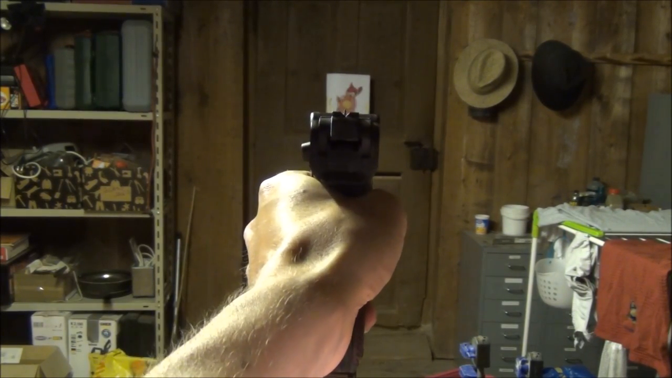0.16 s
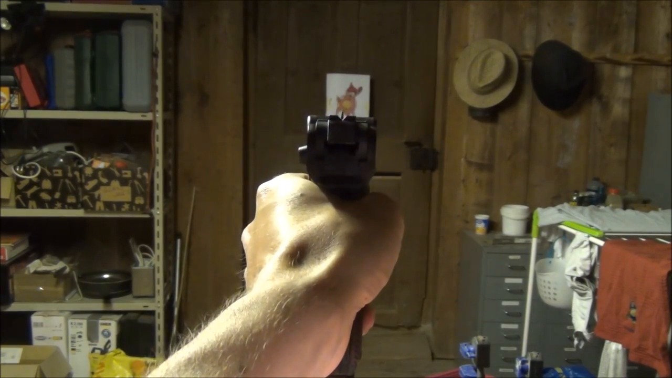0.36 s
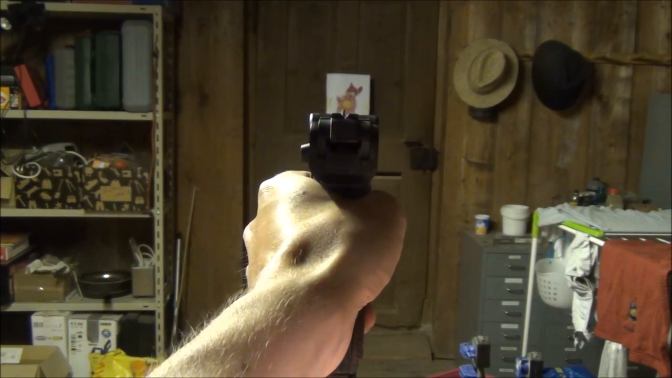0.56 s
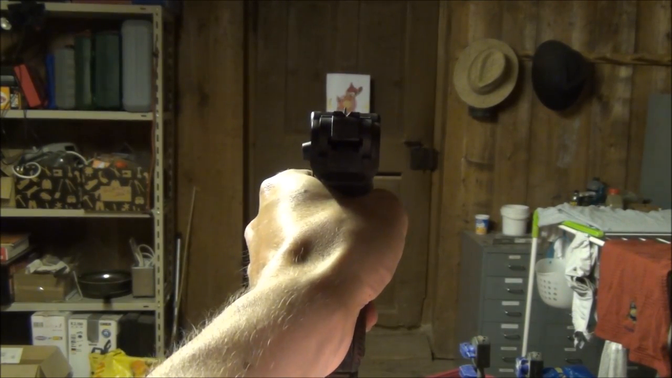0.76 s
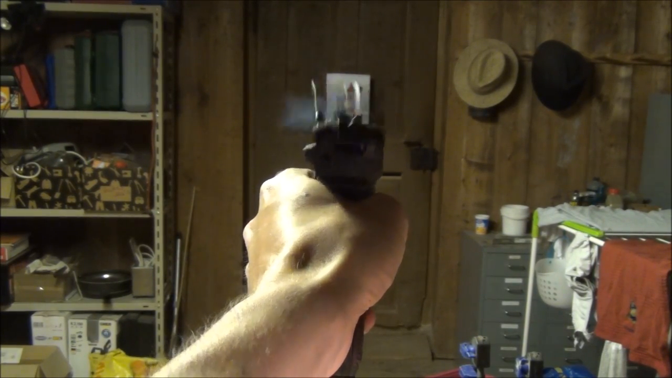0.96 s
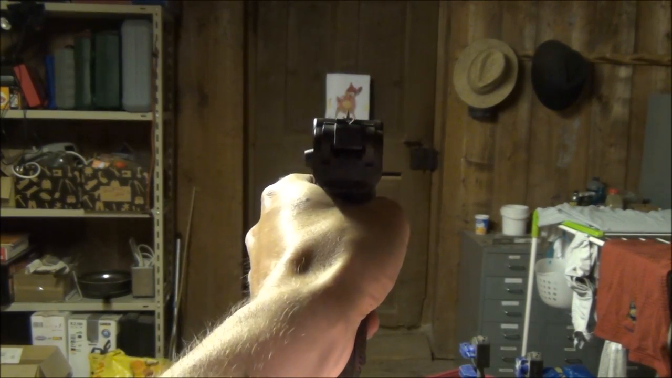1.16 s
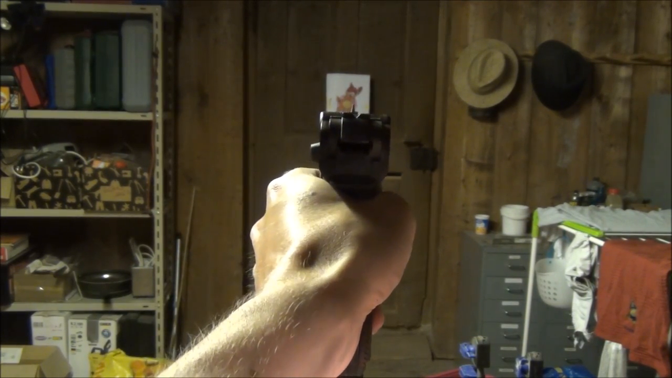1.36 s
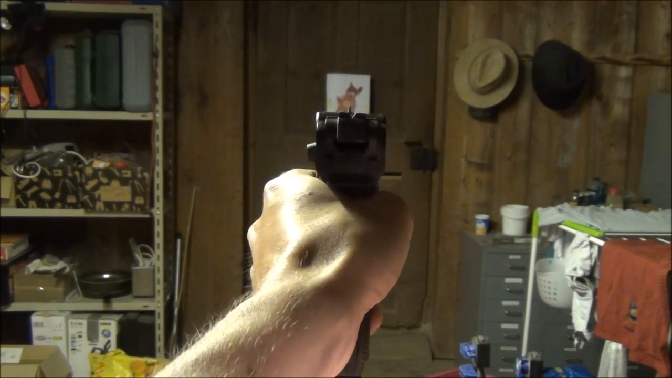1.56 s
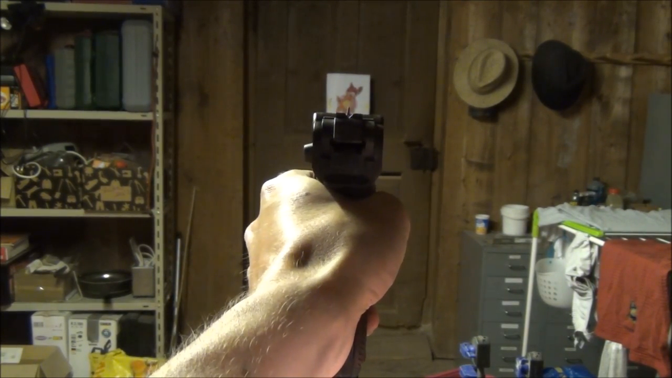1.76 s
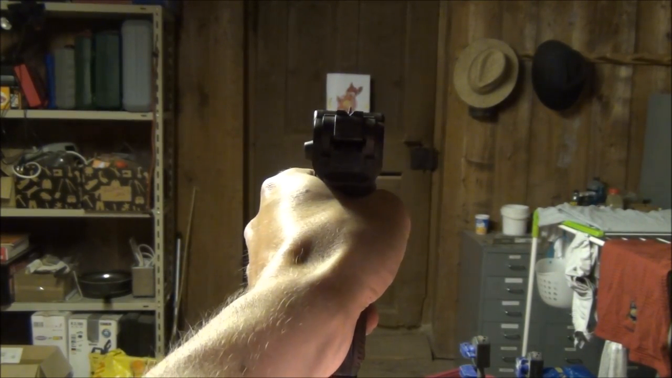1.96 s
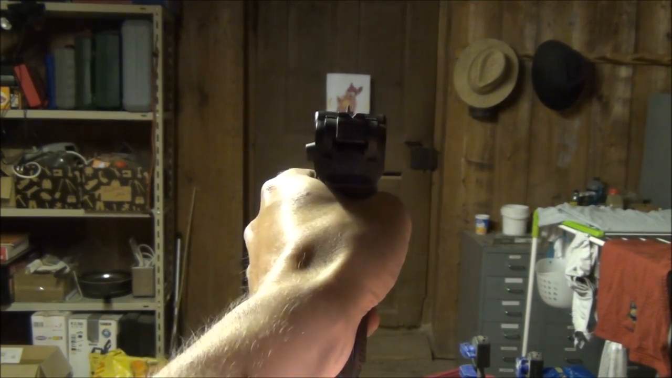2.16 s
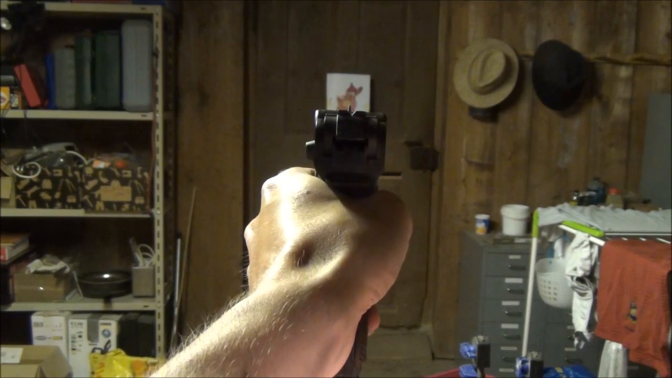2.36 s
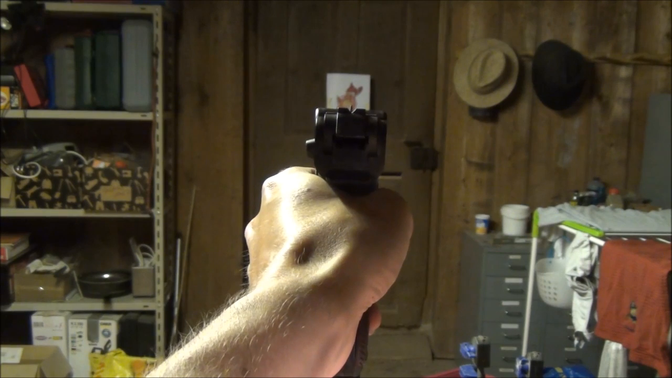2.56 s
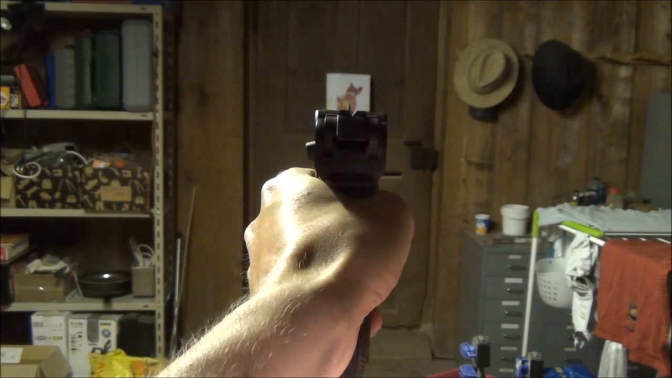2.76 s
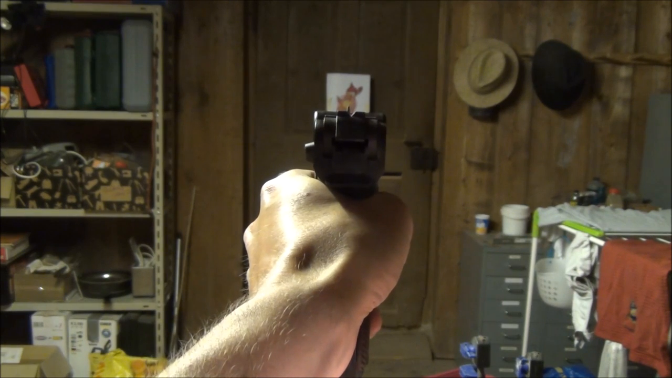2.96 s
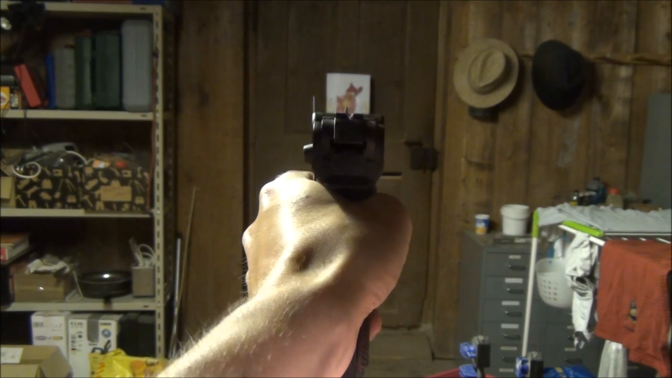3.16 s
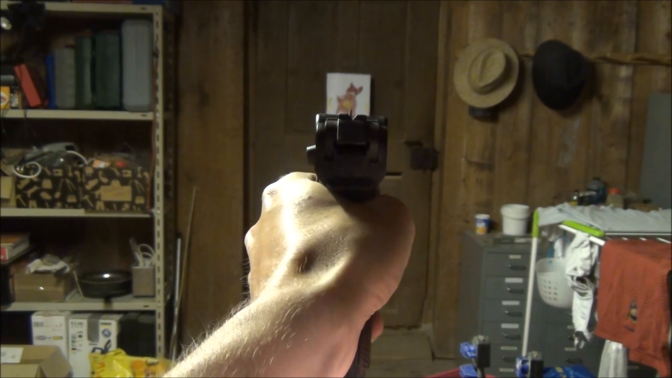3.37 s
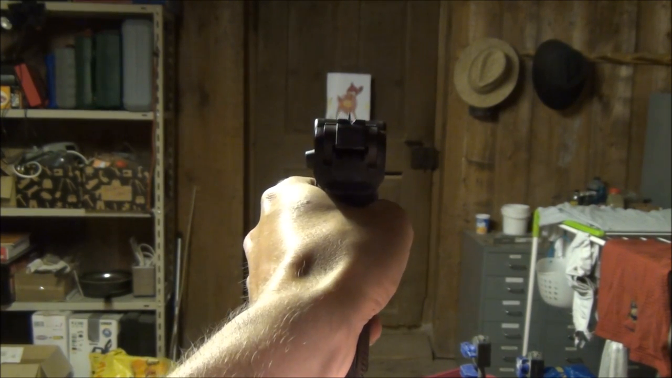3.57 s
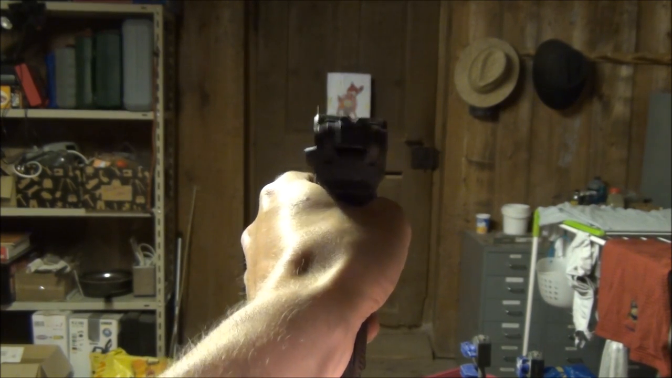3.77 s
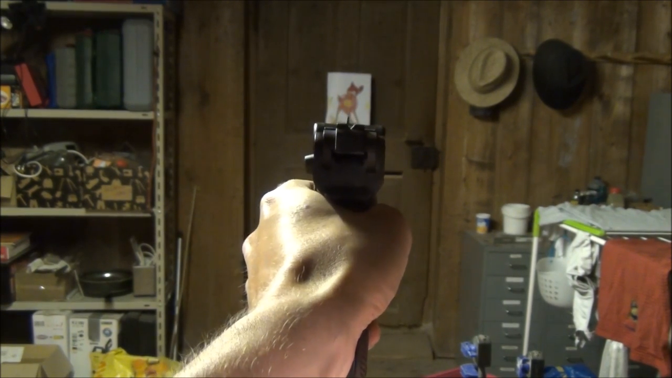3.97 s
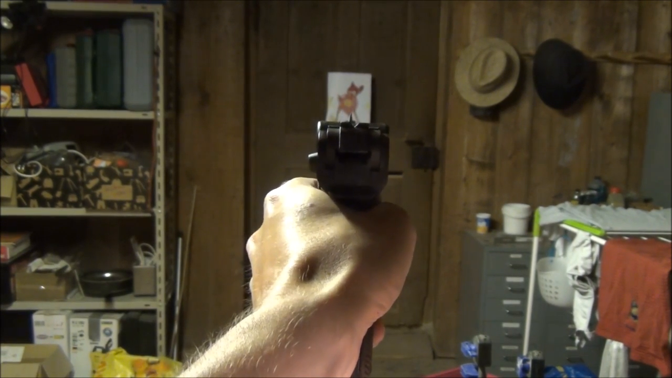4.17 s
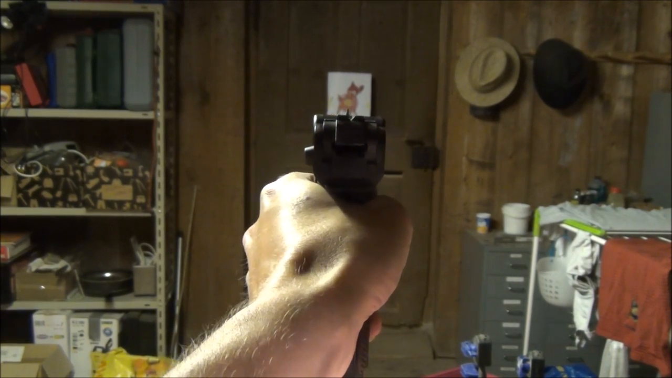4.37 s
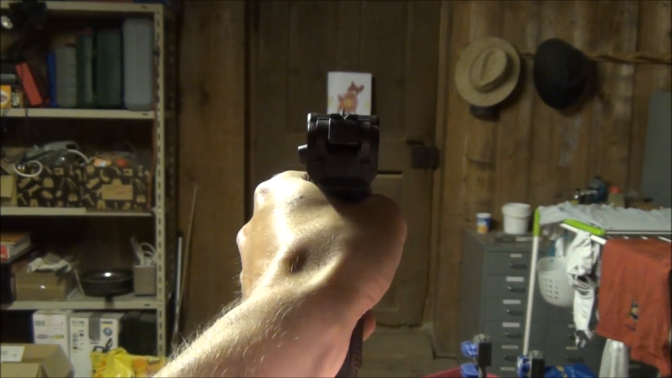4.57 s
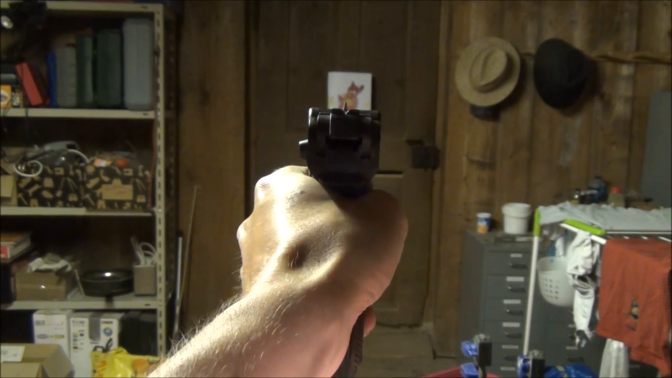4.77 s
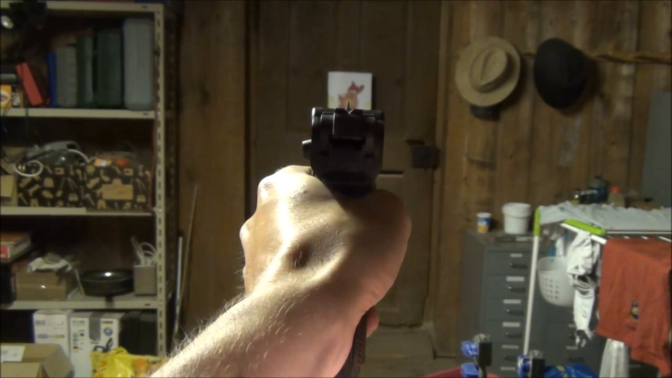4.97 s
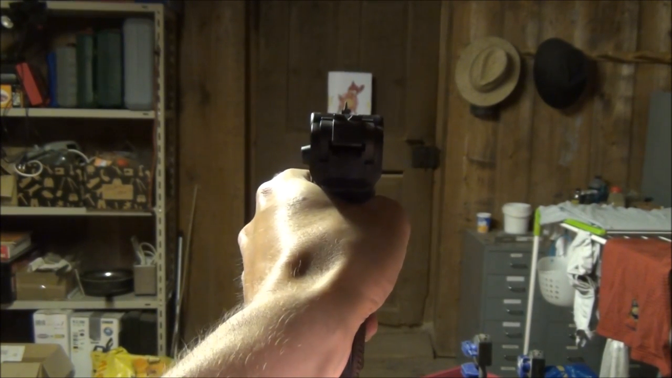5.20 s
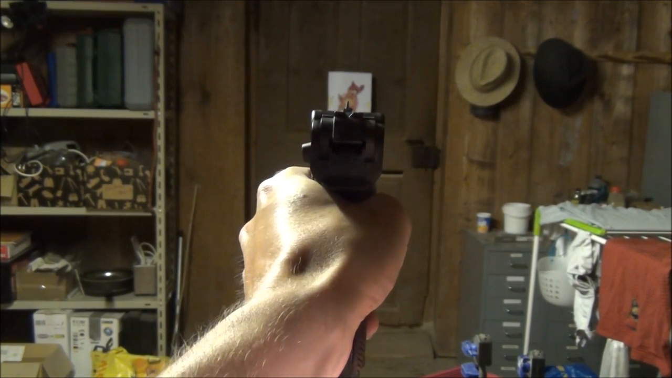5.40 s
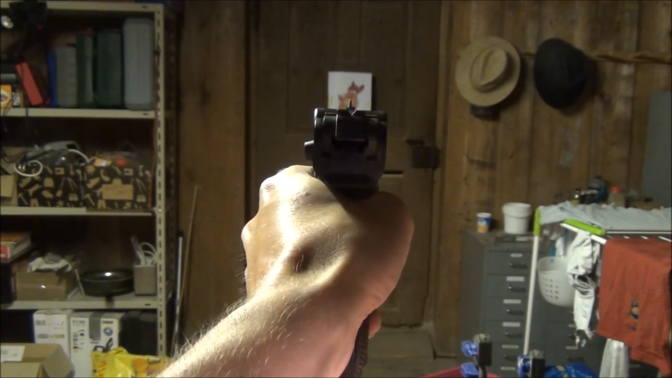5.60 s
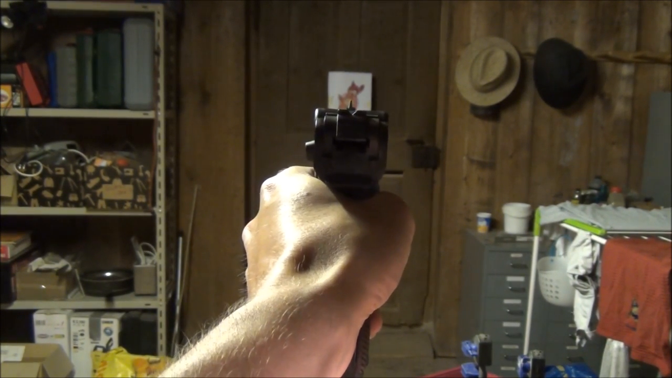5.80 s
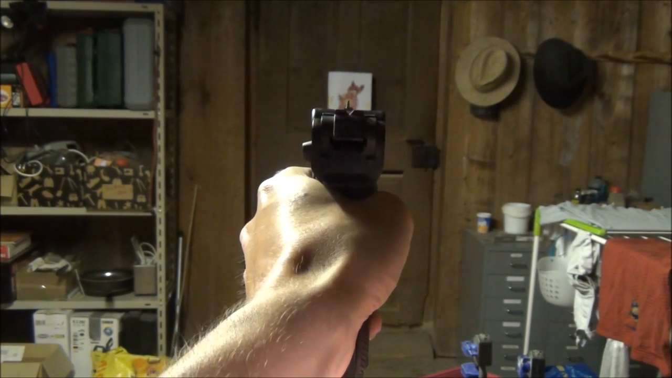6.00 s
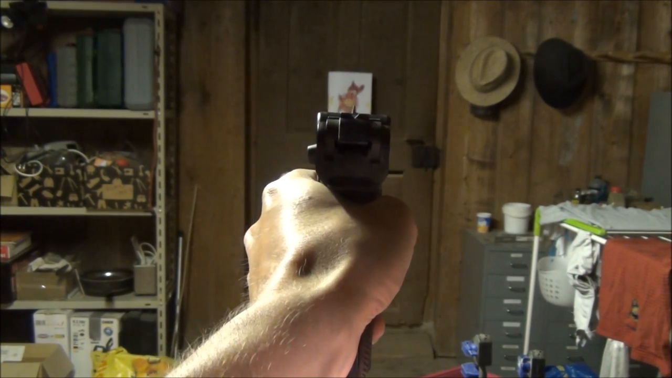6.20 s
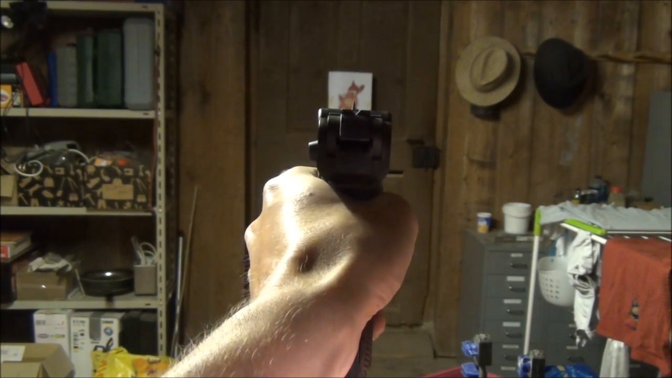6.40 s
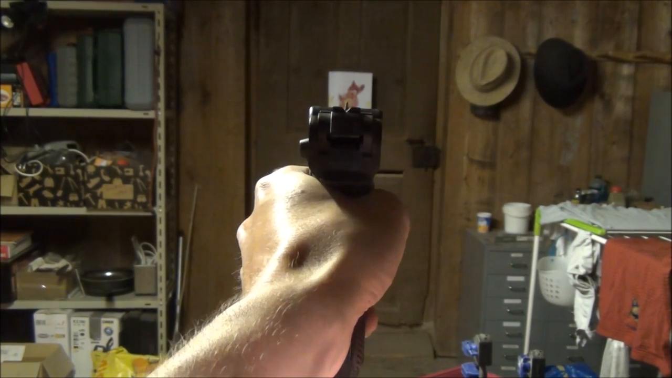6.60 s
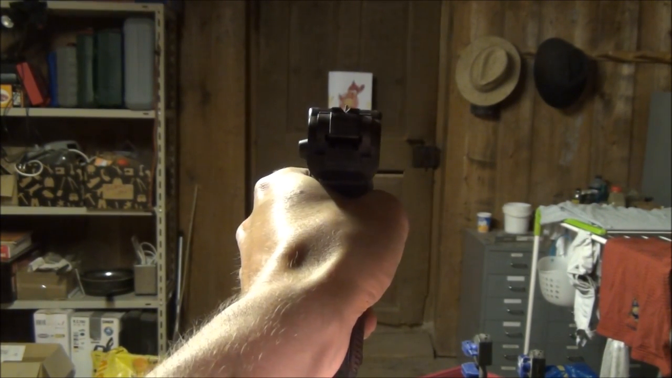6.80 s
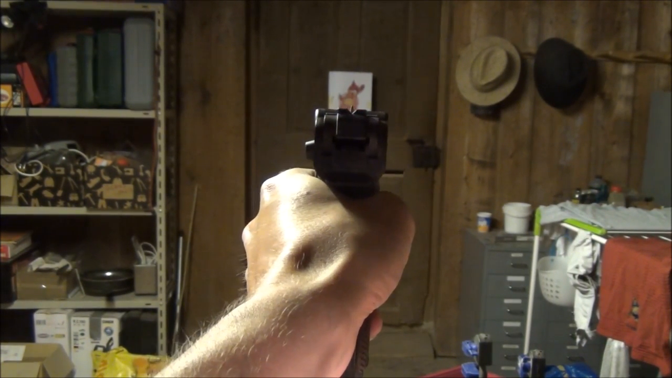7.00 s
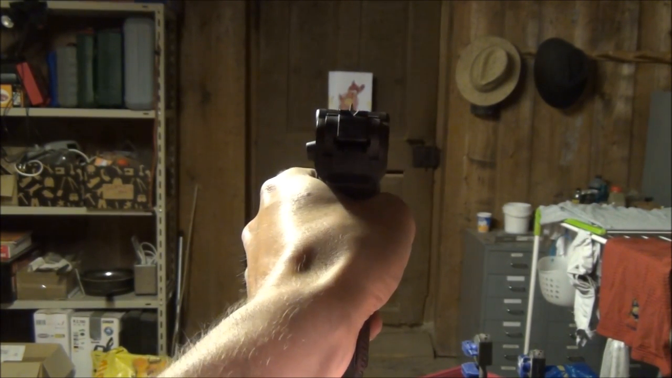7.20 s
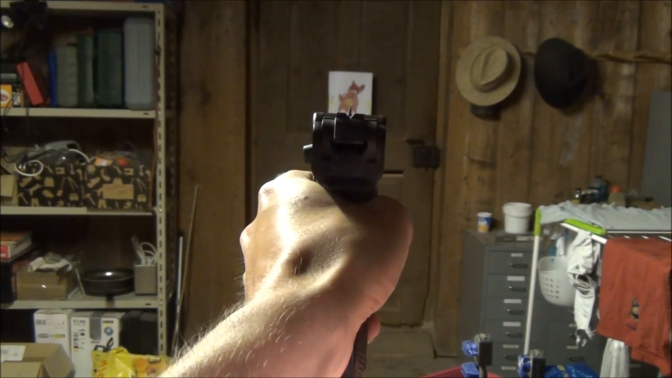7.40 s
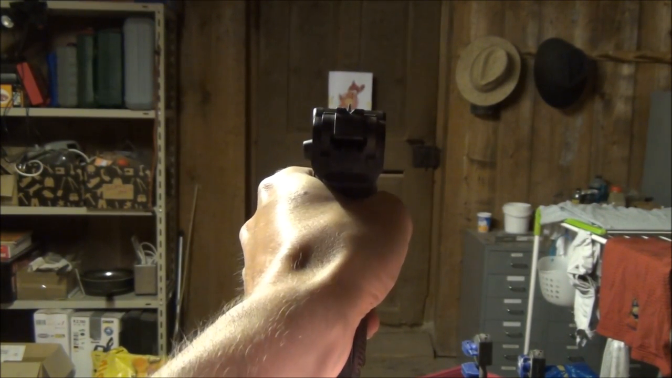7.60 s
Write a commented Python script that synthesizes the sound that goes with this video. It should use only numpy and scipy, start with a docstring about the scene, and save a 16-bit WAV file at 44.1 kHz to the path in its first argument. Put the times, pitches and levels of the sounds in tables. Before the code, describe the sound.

A gas pistol with a moving slide fires eight times indoors, very close to the microphones. The first shot stands alone, four follow about half a second apart, then three come slower. Each is a bright crack and gas burst with metallic slide clatter and a pellet smack on wood, followed by a short room echo. Small ticks and faint hum fill the gaps.

```python
"""Gas pistol in a workshop

A gas pistol with a moving slide fires eight times in a wooden workshop, just in front of a camera.
Each shot is a chain of knocks (decaying resonant noise) and a pressure push; echoes and rings fill the room.
Ticks, one low creak, a bouncing pellet, hiss, machine tones and a throbbing whine lie around the shots.
The camera's limiter flattens the loud start of a shot; its slow gain control pulls the hum down after it."""
import sys
import numpy as np
from scipy import signal
from scipy.fft import rfft, irfft
from scipy.io import wavfile
from scipy.ndimage import uniform_filter1d

SR = 44100
rng = np.random.default_rng(int(sys.argv[2]) if len(sys.argv) > 2 else 0)


def inscribe(sig):
    """Save sig as 16-bit PCM at rate SR to the path in sys.argv[1].

    A 1-D sig is mono; a 2-D sig holds one channel per row.
    Samples are clipped to [-1, 1] before scaling.
    """
    pcm = np.round(np.clip(np.atleast_2d(sig).T, -1, 1) * 32767)
    wavfile.write(sys.argv[1], SR, pcm.astype(np.int16))


N = 337365

# Shots: [t/s, strength/dB, swell onset lead/s, swell and hammer level/dB, push level/dB,
# pellet-on-door level/dB]
SHOT_TABLE = [(0.9795, 2, 0.012, -6, 30.5, 18.5), (2.097, 1.5, .015, -1.5, 14.5, 18),
              (2.67, 2, 0.012, 2, 14, 18.5), (3.2329, 1, 0.012, 0, 7, 18.5),
              (3.768, 0, 0.012, 1, 3.5, 25.5), (5.0562, 2.5, .011, 4, 22, 20.5),
              (5.9217, 1, 0.011, 2, 14, 18), (7.129, 0, 0.013, 0, 13, 18)]
# Fixed steps of a shot, valve to thump: [delay/s, level before strength/dB, f/Hz, width/Hz, rise/s, t60/s]
SHOT_STEPS = [(-.001, 18, 2200, 2500, .001, .012), (.000, 24, 8000, 16000, .002, .04),
              (.0035, 32, 10200, 3500, .0004, .015), (.0125, 29, 600, 1100, .0004, .012)]
# Slide on its rear stop: [level before strength/dB, f/Hz, width/Hz, rise/s, t60/s]
SLIDE_REAR = (32, 10200, 2100, .0003, 0.014)
# Slide snapping shut: [level before strength/dB, f/Hz, width/Hz, rise/s, t60/s]
SLIDE_SHUT = (30.2, 14000, 6000, 0.00037, 0.012)
# Pellet on the door: [f/Hz, width/Hz, rise/s, t60/s]
PELLET_HIT = (5600, 3400, 0.0001, 0.0094)
# Soft noise swelling before the blast: [level re hammer/dB, f/Hz, width/Hz, rise/s, t60/s]
SOFT_SWELL = (-12, 1700, 2800, .003, .06)
# Hammer on the valve: [f/Hz, width/Hz, rise/s, t60/s]
VALVE_HIT = (4100, 19000, 0.0011, .025)
# Ticks and one low creak between shots: [t/s, level/dB, f/Hz, after-rustle t60/s]
TICKS_AND_CREAK = [(2.634, -40, 2200, 0.13), (3.172, -31, 750, 0.58), (3.7045, -53, 1993, .05),
                   (5.03, -30, 1985, 0.11), (5.666, -51.5, 12570, 0.018), (5.892, -31.5, 2000, 0.12),
                   (6.705, -38, 2780, 0.076), (7.0634, -41, 2400, .07), (7.1015, -31, 1900, .07)]
# Spent pellet bouncing to rest: [t/s, level/dB]
PELLET_BOUNCES = [(5.385, -38.5), (5.407, -44), (5.42, -40), (5.441, -45), (5.465, -46)]
# Board it bounces on: [level re bounce/dB, f/Hz, width/Hz, rise/s, t60/s]
BOARD_RINGS = [(5, 260, 1200, .001, 0.19), (-5, 2120, 400, .001, 0.12)]
# Echo decay: [f/Hz, t60/s]
ROOM_DECAY = [(60, 0.54), (160, 0.37), (420, 0.31), (1100, 0.29), (2900, 0.31), (7000, .29), (11000, 0.24),
              (14000, 0.22), (16000, 0.24)]
# Echo spectrum: [f/Hz, level/dB]
ECHO_SPECTRUM = [(15, -53.5), (25, -30), (108, -22.5), (354, -3.5), (607, -4), (818, -2), (1480, -7.5),
                 (3340, -4), (4870, -6.5), (5880, -0.5), (7310, -4.5), (9570, 0), (13200, -1.5),
                 (16000, -15)]
# Room and shelves ringing: [f/Hz, width/Hz, level before strength/dB, t60/s]
ROOM_RINGS = [(74.4, 8.4, -22, 0.54), (181, 18, -3.5, 0.41), (232, 3.9, -44.5, 3), (326.6, 6, 14, 0.24),
              (325.6, 0.5, -46.5, 3), (423.4, 7.1, 2.5, 0.33), (1130, 14, 4, 0.34), (5700, 150, 4, 0.11),
              (631, 14, -5.5, 0.33), (795, 8.4, -1.5, 0.31)]
# Hiss spectrum, relative: [f/Hz, level/dB per Hz]
HISS_SPECTRUM = [(12, -44.5), (20, -14), (177, 1.5), (210, -1), (255, -2.5), (738, -9), (1120, -4.5),
                 (1370, -11.5), (1530, -14), (2020, -15), (3160, -14.5), (5080, -23), (6010, -17.5),
                 (11800, -18), (16000, -19.5)]
# Humps on the hiss: [f/Hz, width/Hz, level/dB rms]
HISS_HUMPS = [(184, 12, -64.5), (250, 25, -64), (1100, 250, -66.5), (1526, 42, -64), (8100, 330, -74),
              (11700, 900, -65), (13300, 300, -72)]
# Steady tones of a small machine: [f/Hz, level in the sum/dB rms]
MACHINE_TONES = [(771, -75.5), (1028, -69.5), (1098, -70.5), (1157, -64.5), (1287, -66.5), (1545, -70),
                 (1803, -74), (7854, -75), (7881, -75.5), (11326, -79.5), (11391, -73.5), (11892, -74),
                 (12290, -72.5), (13248, -73.5)]
# Throbbing tone: [f/Hz, level in the sum/dB rms, throb rate/Hz, sharpness]
THROB_WHINE = (3189.5, -68, 28, 2.5)
# Left-right difference filter: [f/Hz, gain/dB]
SIDE_GAIN = [(40, -19.5), (130, -17), (300, -20.5), (1200, -25), (2200, -42.5), (4000, -40), (5500, -14.5),
             (10500, -12.5), (12500, -34.5), (16000, -34.5)]

HAMMER_HIT_LEAD_S = 0.005
PUSH_DELAY_S, PUSH_SCALE_S = 0.002, 0.0011
COOLING_SHOTS = 6.0  # e-folding count
# delay after the blast: (warm gas, added once cold)
REAR_DELAY_S, PELLET_DELAY_S, SHUT_DELAY_S = (0.013, 0.008), (0.0467, 0.0055), (0.052, 0.0155)
TICK_WIDTH_HZ, TICK_RISE_S, TICK_T60_S, RUSTLE_REL_DB = 2500, 0.0008, 0.019, -3
ECHO_ENERGY_DB = 55.5  # one blast's sum tail, before strength
HISS_DB = -50.5  # rms over sum and difference, before the side gain
# gains into the difference; hiss and rings also pass SIDE_GAIN
HISS_SIDE_DB, TONE_SIDE_DB, GUN_SIDE_DB, RING_SIDE_DB = 3.5, -11, -24, -3
RECOVER_DB_PER_S, LOOKAHEAD_S = 3.2, 0.03  # slow gain control
EDGE_HZ = 16000


def pistol():
    """Shots, ticks, creak and bounces, without deep bass: a small gun moves none."""
    out = shots() + ticks_and_creak() + pellet_bounces()
    return signal.sosfilt(signal.butter(2, 60, "highpass", fs=SR, output="sos"), out)


def shots():
    """Soft swell, hammer, valve, gas, slide on its rear stop, pellet, slide shut; cooling gas delays the last three."""
    out = np.zeros(N)
    for k, (s, strength_db, lead_s, hammer_db, push_db, pellet_db) in enumerate(SHOT_TABLE):
        cold = 1 - np.exp(-k / COOLING_SHOTS)
        rear_s, pellet_s, shut_s = (warm + cold * added
                                    for warm, added in (REAR_DELAY_S, PELLET_DELAY_S, SHUT_DELAY_S))
        steps = SHOT_STEPS + [(rear_s, *SLIDE_REAR), (shut_s, *SLIDE_SHUT)]
        for delay_s, db, *ring in steps:
            add(out, s + delay_s, knock(db + strength_db, *ring))
        add(out, s - lead_s, gain_of(hammer_db) * knock(*SOFT_SWELL))
        add(out, s - HAMMER_HIT_LEAD_S, knock(hammer_db, *VALVE_HIT))
        add(out, s + PUSH_DELAY_S, push(push_db))
        add(out, s + pellet_s, knock(pellet_db, *PELLET_HIT))
    return out


def knock(db, f_hz, width_hz, rise_s, t60_s):
    """Noise through two equal resonances; exponential rise and decay, cut at 93 ms."""
    t = np.arange(4096) / SR
    noise = resonate(rng.standard_normal(len(t)), f_hz, width_hz)
    noise = resonate(noise, f_hz, width_hz)
    return unit_rms(noise) * (1 - np.exp(-t / rise_s)) * gain_of(db - 60 * t / t60_s)


def push(db):
    """Gas shoves the air out and it swings back: one low pressure wave."""
    u = np.arange(2048) / SR / PUSH_SCALE_S
    return gain_of(db) * u * (2 - u) * np.exp(-u)


def ticks_and_creak():
    """A short knock plus a slower-rising rustle at the same frequency; the low, long one is a creak."""
    out = np.zeros(N)
    for s, db, f_hz, t60_s in TICKS_AND_CREAK:
        add(out, s, knock(db, f_hz, TICK_WIDTH_HZ, TICK_RISE_S, TICK_T60_S))
        add(out, s, knock(db + RUSTLE_REL_DB, f_hz, TICK_WIDTH_HZ, TICK_T60_S / 2, t60_s))
    return out


def pellet_bounces():
    """Each bounce excites every resonance of the board."""
    out = np.zeros(N)
    for s, db in PELLET_BOUNCES:
        add(out, s, sum(knock(db + ring_db, *ring) for ring_db, *ring in BOARD_RINGS))
    return out


def room():
    """Blast response of the room, sum and difference: fresh echoes as the aim shifts, plus fixed rings."""
    out = room_rings()
    for s, strength_db, *_ in SHOT_TABLE:
        add(out, s, gain_of(strength_db) * echoes())
    return out


def echoes():
    """Echo tails, sparse arrivals standing out early, each band dying at its own rate."""
    noise = colour(rng.standard_normal((2, SR)), ECHO_SPECTRUM)
    f_hz, t, z = signal.stft(noise, SR, nperseg=512)
    decay = gain_of(-60 * t / read(ROOM_DECAY, f_hz)[:, None])
    tail = signal.istft(z * decay, SR, nperseg=512)[1][:, :SR]
    t = np.arange(SR) / SR
    hits = rng.random(SR) < 300 / SR  # 300 arrivals/s on average
    arrivals = signal.lfilter([1], [1, -np.exp(-1 / (0.0011 * SR))], hits)
    tail *= (1 - np.exp(-t / 0.02)) * (1 + 1.5 * arrivals * np.exp(-t / 0.046))
    return gain_of(ECHO_ENERGY_DB) * tail / np.linalg.norm(tail[0])


def room_rings():
    """Narrow noise bands as slightly blurred modes, restarted by each blast."""
    since_s, strength, t = np.full(N, 9.0), np.zeros(N), np.arange(N) / SR
    for s, strength_db, *_ in SHOT_TABLE:
        since_s[t >= s] = t[t >= s] - s
        strength[t >= s] = gain_of(strength_db)
    out = np.zeros(N)
    for f_hz, width_hz, db, t60_s in ROOM_RINGS:
        ring = unit_rms(resonate(rng.standard_normal(N), f_hz, width_hz))
        out += ring * gain_of(db - 60 * since_s / t60_s)
    out *= strength * (1 - np.exp(-since_s / 0.0028))
    return out * gain_of([[0], [RING_SIDE_DB]])


def background():
    """Hiss, machine tones and whine in sum and difference."""
    return hiss() + (machine_tones() + whine()) * gain_of([[0], [TONE_SIDE_DB]])


def hiss():
    """Steady coloured noise; resonant humps in the sum only."""
    out = gain_of(HISS_DB) * unit_rms(colour(rng.standard_normal((2, N)), HISS_SPECTRUM))
    out[1] = gain_of(HISS_SIDE_DB) * colour(out[1], SIDE_GAIN)
    for f_hz, width_hz, db in HISS_HUMPS:
        out[0] += gain_of(db) * unit_rms(resonate(rng.standard_normal(N), f_hz, width_hz))
    return out


def machine_tones():
    """Steady sines at random phases."""
    t = np.arange(N) / SR
    return sum(gain_of(db) * np.sqrt(2) * np.sin(2 * np.pi * (f_hz * t + rng.random()))
               for f_hz, db in MACHINE_TONES)


def whine():
    """Sine plus narrow noise, amplitude-modulated by periodic pulses."""
    t = np.arange(N) / SR
    f_hz, db, rate_hz, sharpness = THROB_WHINE
    throb = np.exp(sharpness * np.cos(2 * np.pi * rate_hz * t))
    blur = unit_rms(resonate(rng.standard_normal(N), f_hz, 8.0))
    return gain_of(db) * unit_rms(throb * (np.sin(2 * np.pi * f_hz * t) + 0.6 * blur))


def gain_of(db):
    """Decibels to amplitude factor."""
    return 10 ** (np.asarray(db) / 20)


def unit_rms(x):
    """Scales to rms 1."""
    return x / np.sqrt(np.mean(x ** 2) + 1e-20)


def read(points, f_hz):
    """Interpolates a table on a log-frequency axis."""
    f, value = np.transpose(points)
    return np.interp(np.log(f_hz + 1), np.log(f + 1), value)


def colour(x, points):
    """Filters x by a dB table in the frequency domain."""
    f_hz = np.fft.rfftfreq(x.shape[-1], 1 / SR)
    return irfft(rfft(x) * gain_of(read(points, f_hz)), x.shape[-1])


def resonate(x, f_hz, width_hz):
    """One resonance: shift down, smooth, shift back."""
    turn = np.exp(2j * np.pi * f_hz * np.arange(len(x)) / SR)
    r = np.exp(-np.pi * width_hz / SR)
    return (turn * signal.lfilter([1 - r], [1, -r], x / turn)).real


def add(mix, s, sound):
    """Mixes a sound in at s seconds, cut at the end of the mix."""
    part = mix[..., round(s * SR):][..., :sound.shape[-1]]
    part += sound[..., :part.shape[-1]]


def scene():
    """Two close microphones: common sum, weak difference."""
    total, difference = room()
    pair = np.array([total, colour(difference, SIDE_GAIN)])
    total, difference = pair + pistol() * gain_of([[0], [GUN_SIDE_DB]]) + background()
    return np.array([total + difference, total - difference])


def level_of(x, smooth_s):
    """Short-time level in dB, power averaged over both channels."""
    power = uniform_filter1d((x ** 2).mean(0), max(round(smooth_s * SR), 1))
    return 10 * np.log10(abs(power) + 1e-12)


def slow_gain(x, knee_db=-30, share=0.41, attack_s=0.054, step=64):
    """Gain sinks towards a share of the excess level, creeps back, and acts LOOKAHEAD_S early."""
    wanted_db = share * (level_of(x, 0.0097)[::step] - knee_db)
    cut_db, now = [], 0.0
    for w in wanted_db:
        if w > now:
            now += (w - now) * step / SR / attack_s
        else:
            now = max(now - RECOVER_DB_PER_S * step / SR, 0)
        cut_db.append(now)
    return gain_of(-np.interp(np.arange(N) / SR + LOOKAHEAD_S, np.arange(len(cut_db)) * step / SR, cut_db))


def limiter(x, knee_db=-14, release_db_per_s=449.0, attack_s=0.00093):
    """Fast gain cut by the full excess of a peak-held level, with linear dB release."""
    fall_db = np.arange(N) * release_db_per_s / SR
    held_db = np.maximum.accumulate(level_of(x, 0.0071) + fall_db) - fall_db
    over_db = 2 * np.logaddexp(0, (held_db - knee_db) / 2)  # soft knee
    keep = np.exp(-1 / (attack_s * SR))
    return gain_of(-signal.lfilter([1 - keep], [1, -keep], over_db))


def record(dry):
    """Slow gain control, limiter, full-scale clip, bass roll-off, band limit, final clip."""
    x = dry * slow_gain(dry)
    x = np.clip(x * limiter(x), -1, 1)
    x = signal.sosfilt(signal.butter(1, 35, "highpass", fs=SR, output="sos"), x)
    lowpass = signal.firwin(1023, EDGE_HZ, window=("kaiser", 9), fs=SR)
    return np.clip(signal.oaconvolve(x, lowpass[None], "same"), -1, 1)


dry = scene()
out = record(dry)
inscribe(out)
```